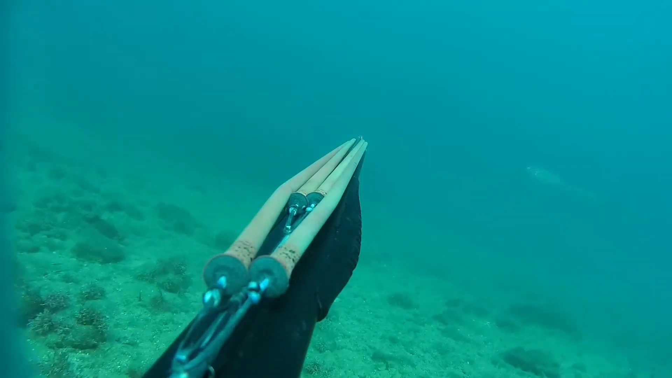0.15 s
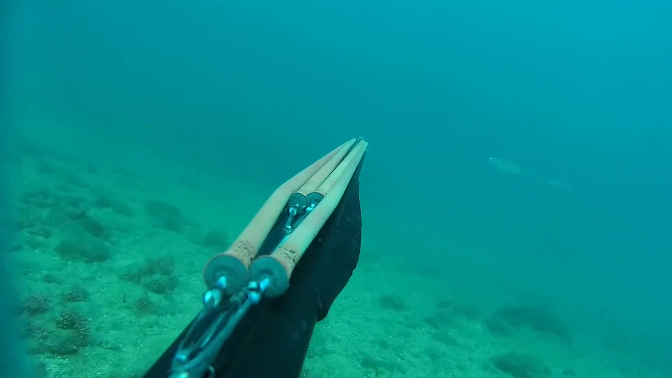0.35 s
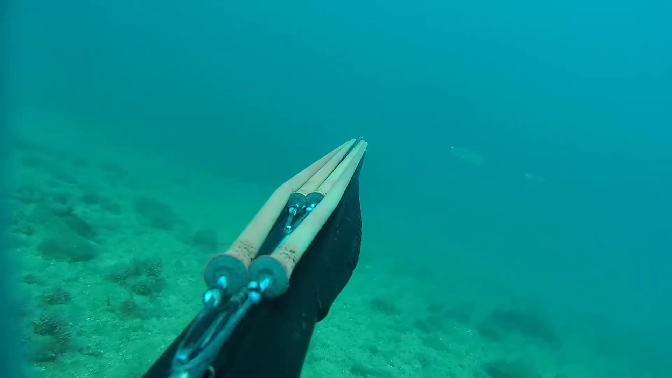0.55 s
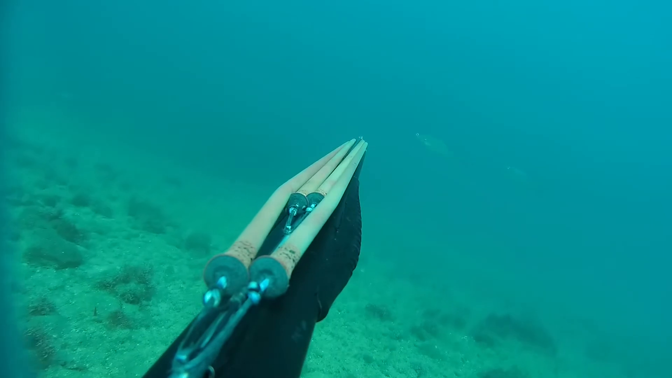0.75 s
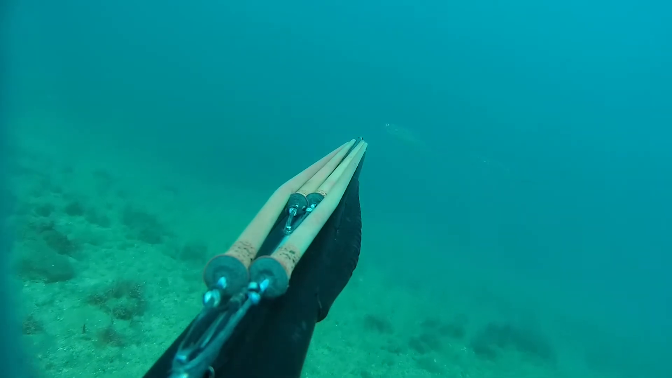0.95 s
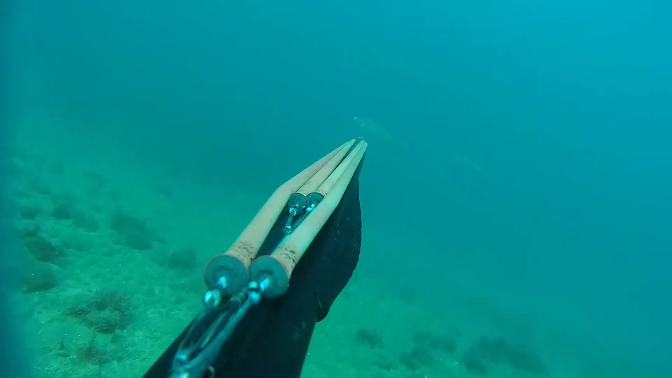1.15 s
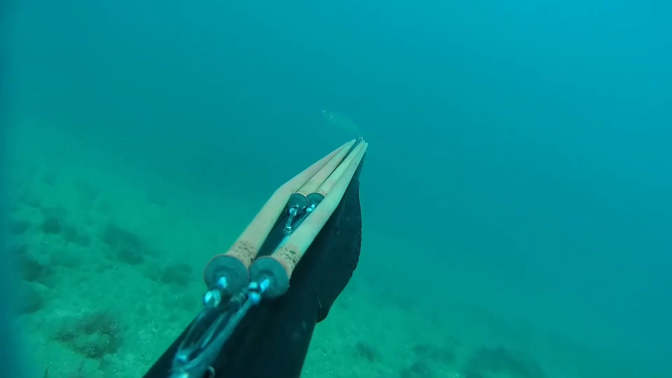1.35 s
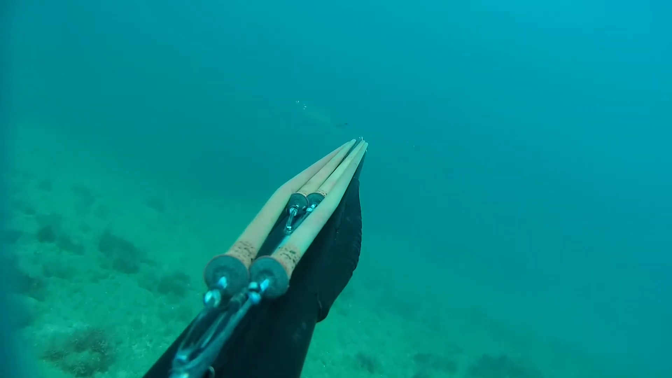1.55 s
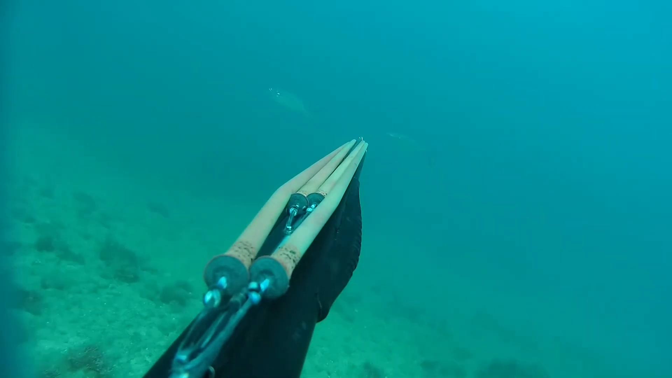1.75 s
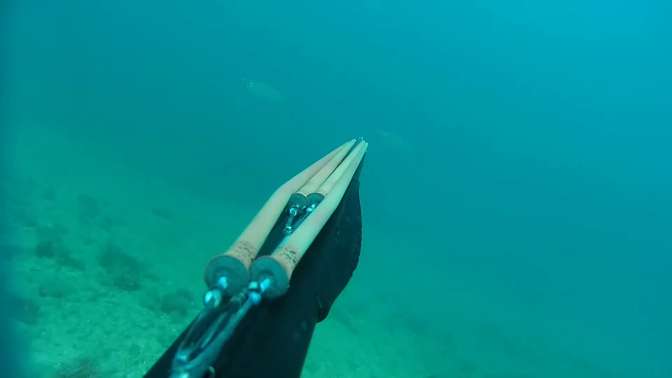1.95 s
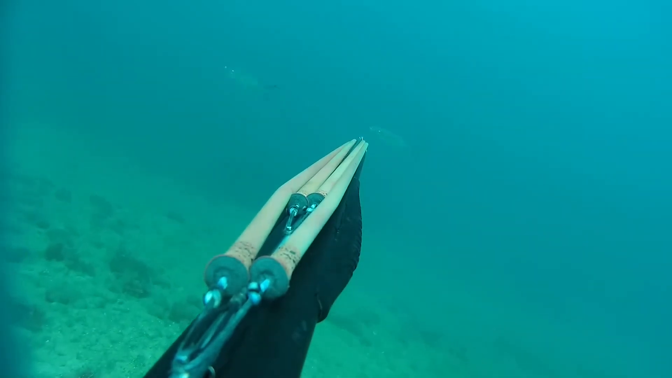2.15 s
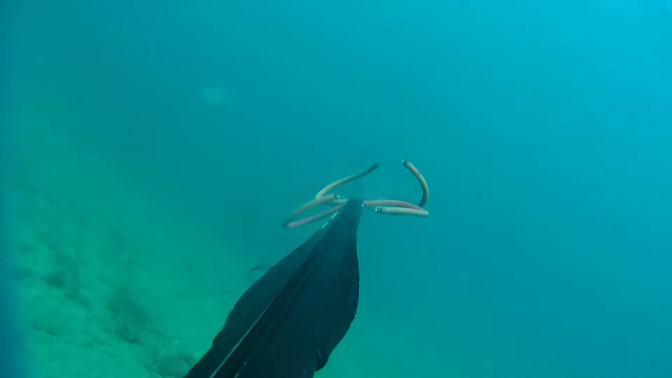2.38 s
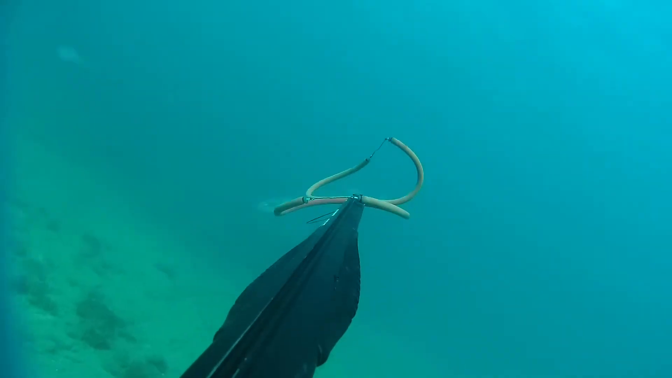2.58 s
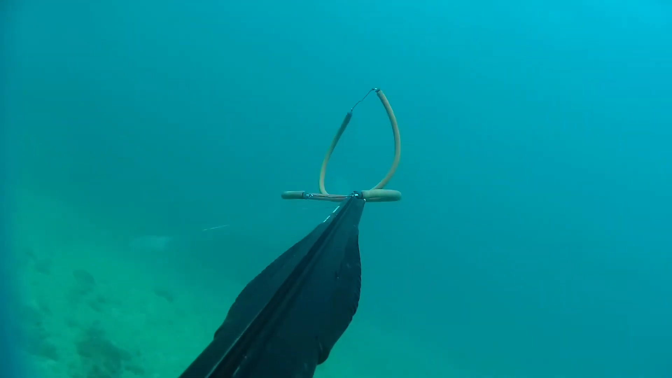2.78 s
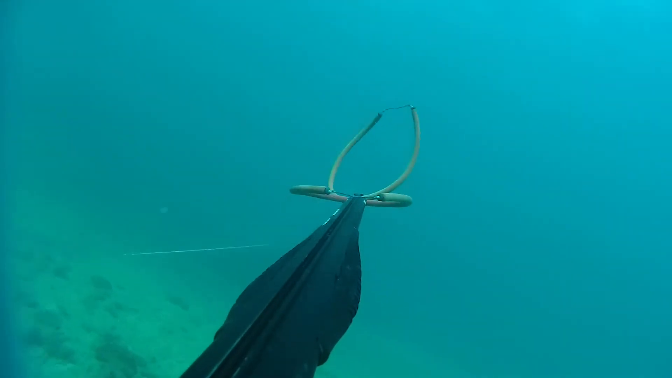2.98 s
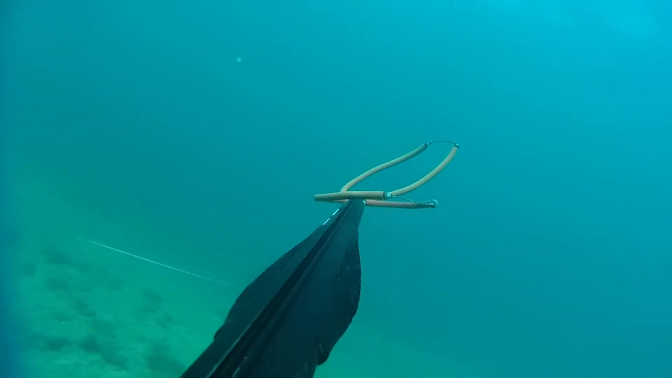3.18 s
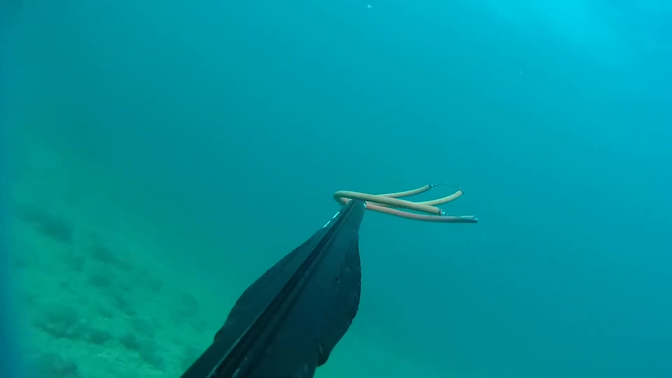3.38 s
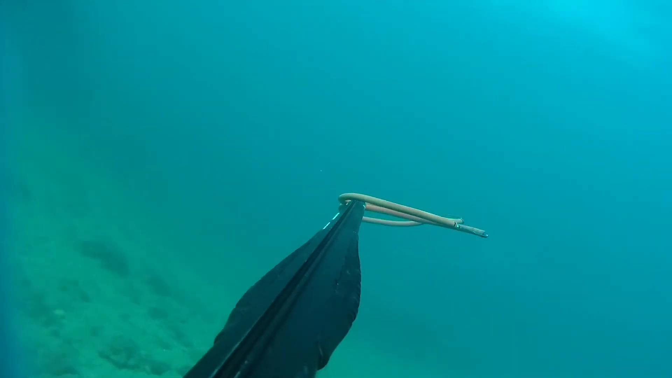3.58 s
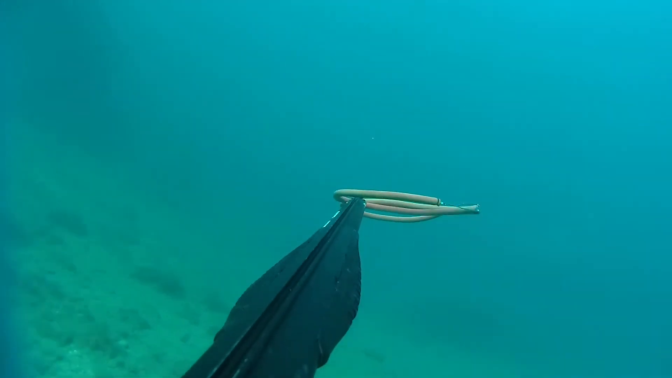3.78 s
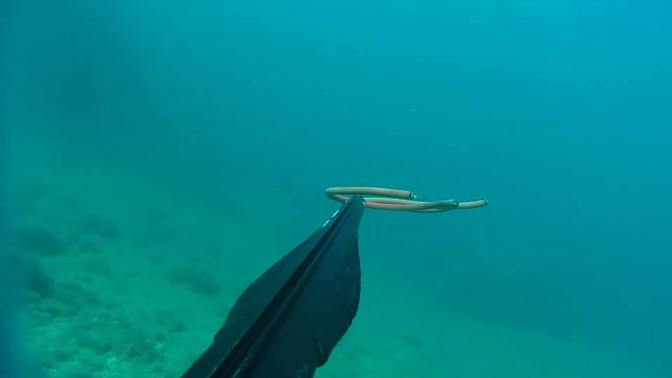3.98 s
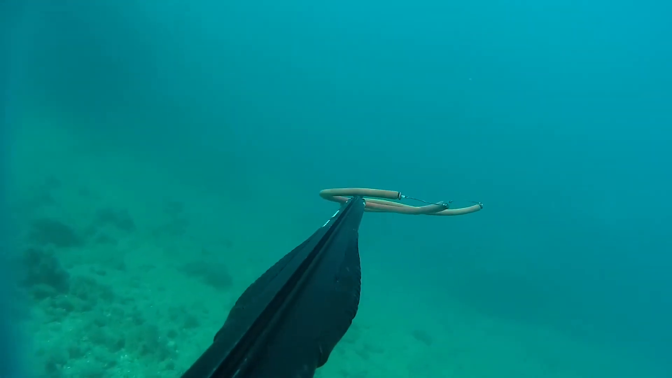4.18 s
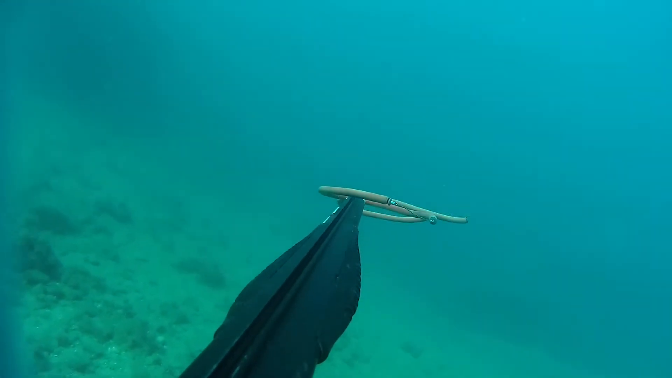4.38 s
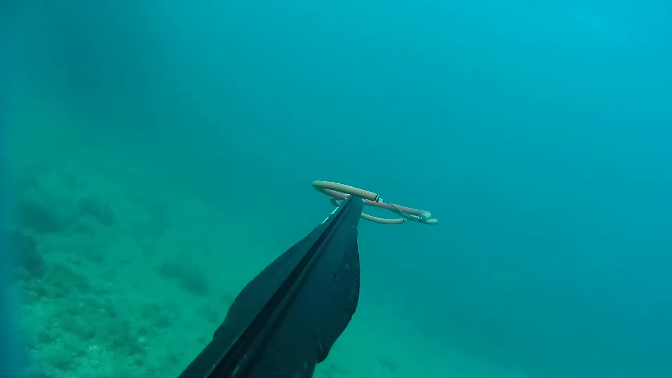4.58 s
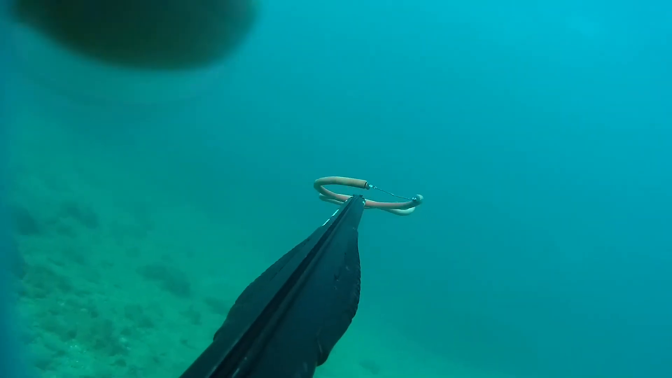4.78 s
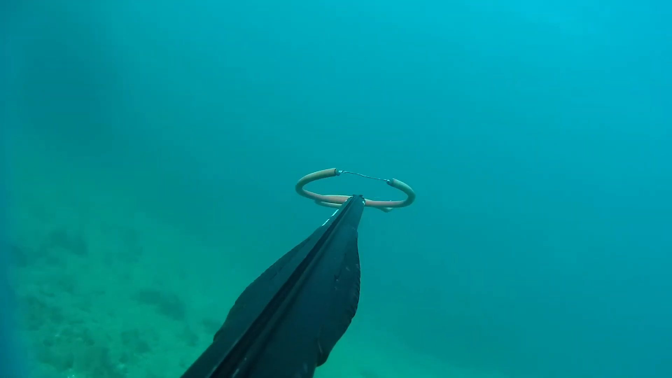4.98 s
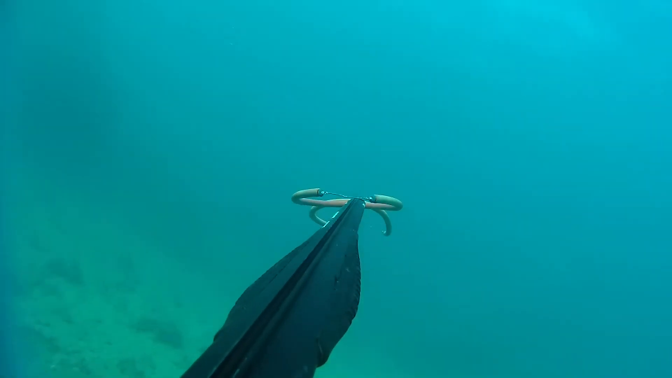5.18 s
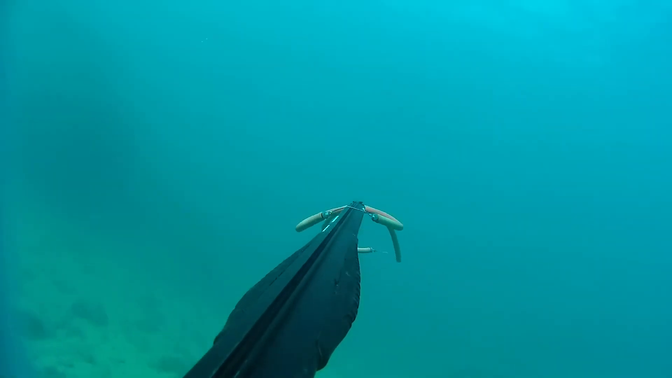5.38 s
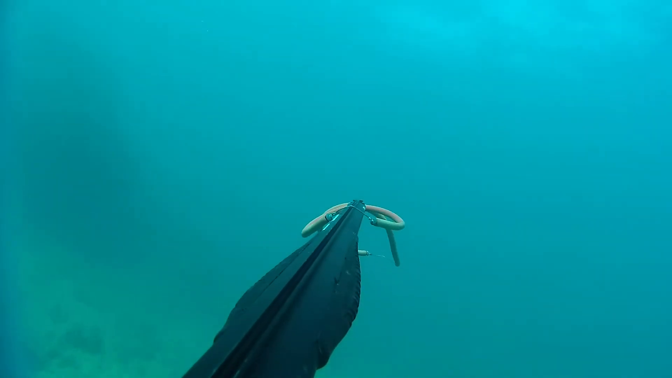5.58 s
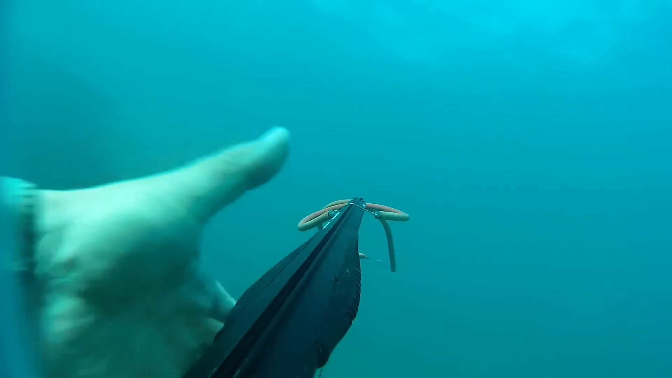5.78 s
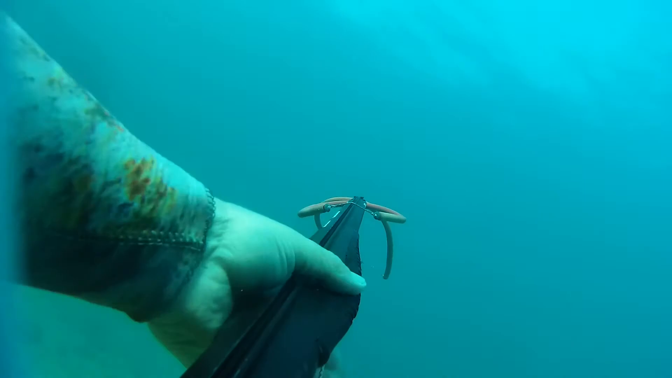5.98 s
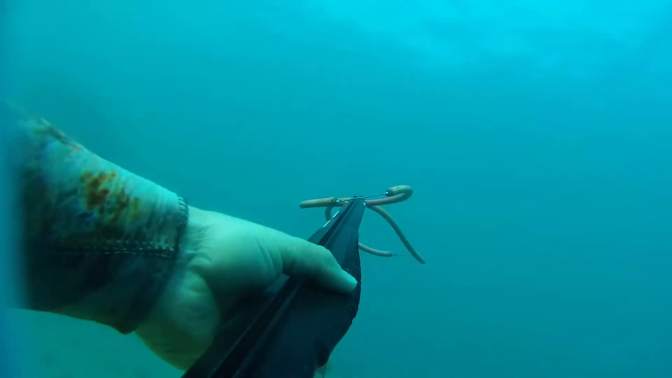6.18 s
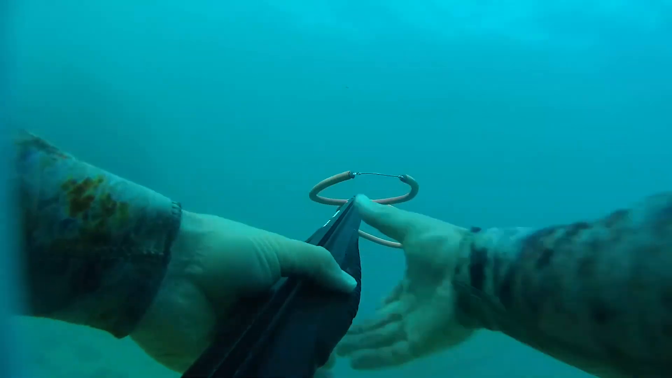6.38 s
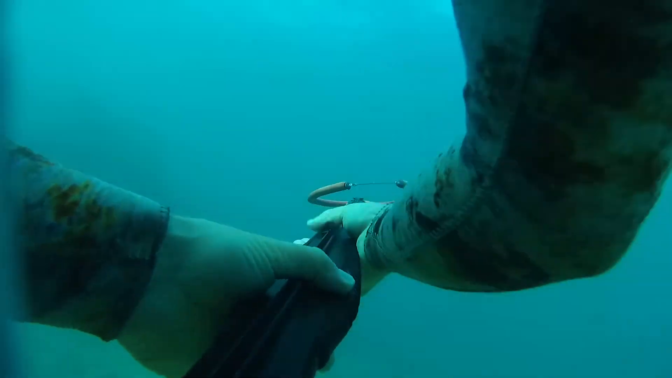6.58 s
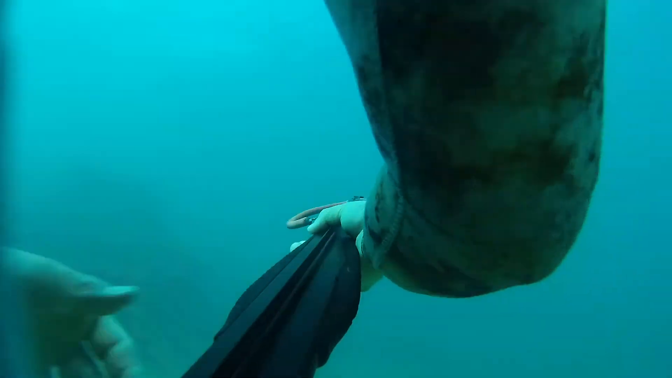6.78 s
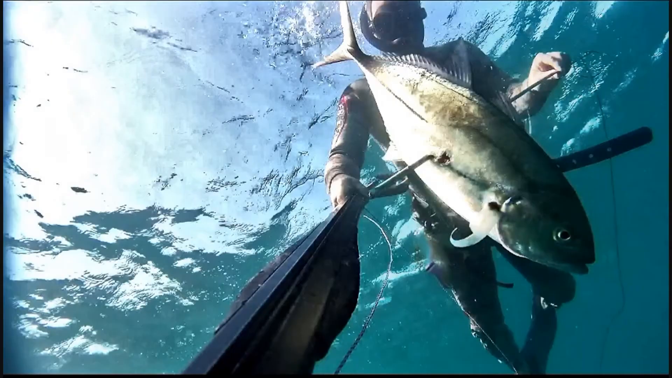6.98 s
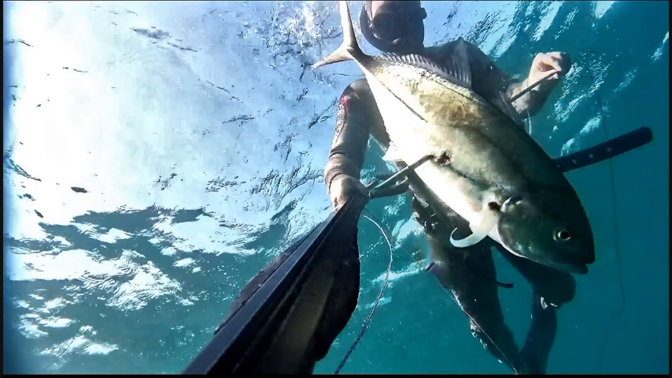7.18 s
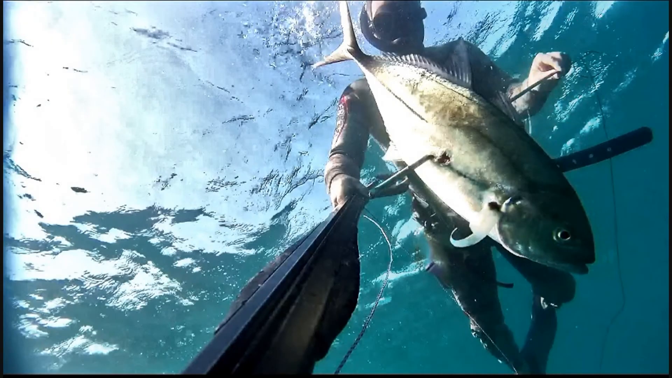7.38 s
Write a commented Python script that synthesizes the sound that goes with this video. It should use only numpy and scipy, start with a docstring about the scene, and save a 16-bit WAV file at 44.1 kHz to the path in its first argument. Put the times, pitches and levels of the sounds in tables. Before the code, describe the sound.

Quiet boxed-in hiss with tiny crackles bursts into a distorted speargun shot, followed by churning line, dull knocks, bubbles and squeaks until abrupt silence.

```python
"""Faint snaps over hiss and whine, then a speargun fires under water and a reel scrapes until a cut to silence.
The camera is clamped to the gun in a sealed case with two microphones: forces on the gun ring the case's modes.
Release, recoil and band slaps overload the input. The line then runs off a reel whose stick-slip drag is
gusty noise, whose knocks are brief contacts, and which squeaks and sheds gliding bubble rings."""
import sys
import numpy as np
from scipy import signal
from scipy.fft import rfft, irfft
from scipy.io import wavfile
from scipy.ndimage import uniform_filter1d

SR = 44100
rng = np.random.default_rng(int(sys.argv[2]) if len(sys.argv) > 2 else 0)


def elevation(decibels):
    """Turn decibel levels (scalar or array-like) into linear amplitude ratios."""
    levels = np.asarray(decibels, float)
    return 10 ** (levels / 20)


def wav_record(signal):
    """Record a signal, one row per channel, as 16-bit PCM in the file named by sys.argv[1]."""
    frames = np.transpose(np.atleast_2d(signal))
    bounded = np.clip(frames, -1, 1)
    # unit amplitude maps onto the largest positive 16-bit level
    quanta = np.round(bounded * 32767).astype(np.int16)
    wavfile.write(sys.argv[1], SR, quanta)


N = 328101
T = np.arange(N) / SR
CUT_S = 6.9037  # silence from here on


def noise(*shape):
    """White noise: independent Gaussian samples of unit variance."""
    return rng.standard_normal(shape + (N,))


def unit(x):
    """Normalization: scale to rms 1."""
    return x / np.sqrt(np.mean(x ** 2))


def walk(rate):
    """Slow random modulation: levels held 1 / rate s, smoothed twice, rms 1."""
    hold = int(SR / rate)
    steps = np.repeat(rng.standard_normal(N // hold + 1), hold)
    smooth = uniform_filter1d(uniform_filter1d(steps, hold), hold)
    return unit(smooth[:N])


def band(x, lo_hz, hi_hz):
    """Band limitation by a Butterworth band-pass."""
    return signal.sosfilt(signal.butter(2, [lo_hz, hi_hz], "band", fs=SR, output="sos"), x)


def resonance(x, hz, width_hz):
    """Damped resonance: a two-pole peak whose quality factor is frequency over width."""
    return signal.lfilter(*signal.iirpeak(hz, hz / width_hz, SR), x)


def contact(forces, s, rise_ms, decay_ms, levels_db, rattle_db=-60, strike=0.31):
    """Impact: one impulse inside a rough contact that builds up, dies within milliseconds and may rattle on."""
    k = np.arange(-400, 2600)
    t_ms = k * 1000 / SR - 1
    before = np.exp(np.minimum(t_ms, 0) / rise_ms)
    after = np.exp(-t_ms / decay_ms) + elevation(rattle_db) * np.exp(-t_ms / 22.0)
    shape = np.where(t_ms < 0, before, after)
    force = shape * rng.standard_normal(len(k))
    force[np.argmax(shape)] += strike * np.sqrt(np.sum(shape ** 2))
    forces[:, int(s * SR) + k] += np.outer(elevation(np.array(levels_db)), force)


# modes of the case: f/Hz, width/Hz, relative level left/dB, right/dB, sign left, sign right
CASE_MODES = [(246.6, 18, -25, -7, 1, 1), (277, 36, -20, -28, -1, 1), (334.7, 20, -24.5, -20, 1, 1),
              (558.4, 50, -51, -54, -1, -1), (712, 23, -29.5, -6, -1, -1), (739.8, 92, -23.5, -3, 1, 1),
              (986.4, 23.2, 9.5, -22.5, -1, -1), (1340, 20, 3.5, -22.5, 1, -1), (1277, 81, 1.5, 9, -1, 1),
              (1540, 160, 1.5, 3, -1, -1), (1867, 291, -0.5, -0.5, 1, 1), (2300, 195, -1.5, -5, -1, -1),
              (3000, 510, -7, -4.5, 1, 1), (3810, 660, -12, -46, 1, -1), (4560, 540, -45, -32.5, 1, 1),
              (5750, 310, -40.5, -46.5, 1, 1), (7300, 1600, -50, -49.5, -1, -1),
              (10600, 2400, -50.5, -55, 1, 1), (14400, 2900, -56, -55.5, -1, -1)]
# borders between the low, middle, high and top modes: f/Hz
GROUP_BORDERS = 900, 2600, 5000


def case(*forces):
    """Modal superposition: four forces ring four groups of modes, each mode weighted per microphone."""
    out = np.zeros((2, N))
    # contacts are soft and far along the gun, so each force keeps to its own range
    reach_hz = [(150., 1560.0), (600., 3660.0), (2200., 5550.0), (4400., 13000.0)]
    for group, force in enumerate(forces):
        modes = [m for m in CASE_MODES if np.searchsorted(GROUP_BORDERS, m[0]) == group]
        force = band(force, *reach_hz[group])
        # about unit sound between the microphones for a unit noise force
        power = sum(np.pi * m[1] / SR * (elevation(m[2]) + elevation(m[3])) ** 2 / 4 for m in modes)
        for hz, width_hz, left_db, right_db, *sign in modes:
            gains = np.sign(sign) * elevation(np.array([left_db, right_db]))
            out += np.outer(gains, resonance(force, hz, width_hz)) / np.sqrt(power)
    return out


# spectral shape of the hiss: f/Hz, relative level/dB
HISS_SHAPE = [(4, 3.5), (16, 6), (35, -2.5), (60, -12), (150, -19), (400, -24), (1500, -35), (6000, -39),
              (8000, -34.5), (11500, -42.5), (14000, -32.5), (15300, -33.5), (15700, -62)]


def hiss():
    """Shaped noise: electronic hiss, partly shared by both inputs and less so toward the treble."""
    hz = np.fft.rfftfreq(N, 1 / SR)
    shape_hz, shape_db = np.transpose(HISS_SHAPE)
    shape = elevation(np.interp(np.log(hz + 1), np.log(shape_hz), shape_db))
    apart = np.clip(hz / 3700.0, .4, 1.5)
    shared, own = rfft(noise()), rfft(noise(2))
    balance = elevation(np.array([[0.], [-6.5]]) / (1 + (hz / 380.0) ** 2))  # less rumble on the right input
    colored = unit(irfft(shape * balance * (shared + apart * own), N))
    return colored * elevation(-57.5 + 0.74 * walk(1.3))


# hum partials: f/Hz, level before balance and drift/dB
HUM_PARTIALS = [(50, -73), (100, -69.5), (150, -75), (200, -86), (300, -83.5)]


def hum():
    """Additive synthesis: steady partials share one wavering level, stronger on the left."""
    tone = sum(elevation(db) * np.sin(2 * np.pi * hz * T + k * k) for k, (hz, db) in enumerate(HUM_PARTIALS))
    return tone * elevation(1.2 * walk(12) + np.array([[1.5], [-3.5]]))


# whine partials: multiple of the base frequency, level left/dB, right/dB
WHINE_PARTIALS = [(2, -69, -101.5), (3, -61.5, -88.5)]


def whine():
    """Frequency modulation: the camera's whine drifts at random and sags once a frame."""
    base_hz, frames_per_s = 4450, 25
    sag = .009 * np.exp(-(T * frames_per_s % 1) / 0.083)
    drift = 0.0005 * walk(6) + 0.0019 * walk(70) + 0.005 * walk(1200) - sag
    phase = 2 * np.pi * np.cumsum(base_hz * (1 + drift)) / SR
    return sum(np.outer(elevation(np.array(db)), np.sin(k * phase)) for k, *db in WHINE_PARTIALS)


def water():
    """Broadband excitation: wavering water noise drives each group of modes."""
    group_db = np.array([[-76.], [-95.], [-82.], [-82.]])
    return noise() * elevation(group_db + 2.0 * walk(23.0))


def air():
    """Cavity resonance: the air in the case, stirred by the sea, sounds as narrow-band noise."""
    return unit(resonance(noise(), 782, 29)) * elevation(-73.5 + np.array([[-3.], [2.5]]))


# small snaps in the water: t/s, nominal level/dB, level above 5 kHz relative to it/dB
SNAPS_HEARD = [(0.1724, -61, 18.5), (0.2414, -46.5, -6), (0.2758, -45, -13), (0.3564, -61, 14),
               (0.582, -42, -13), (0.6465, -37, -23), (0.67, -41, -11), (0.72, -51, -13), (0.85, -43, -19),
               (0.915, -42.5, -4), (1.0165, -51.5, -9), (1.3558, -49, -11), (1.472, -50, -2),
               (1.609, -49, -4), (1.8497, -43.5, 0), (1.924, -60, 18), (1.951, -61, 14),
               (2.0652, -32, -28.5), (2.149, -51, -8)]


def snaps():
    """Impulsive excitation: snaps and a fine crackle ring the upper modes; some snap treble bypasses the case."""
    forces = np.zeros((2, N))
    for s, db, top_db in SNAPS_HEARD:
        contact(forces, s, .6, 3.5, (db - 14.0, db + top_db - 7.5))
    size_db = np.minimum(4.5 * rng.exponential(size=N), 12.) + 4.5 * np.tanh(walk(30))
    clicks_per_s = 600
    crackle = (rng.random(N) < clicks_per_s / SR) * rng.standard_normal(N) * elevation(size_db)
    highpass = signal.butter(4, 1950., "high", fs=SR, output="sos")
    bright = signal.sosfilt(highpass, forces[0] + elevation(-62.5) * crackle)
    middle = elevation(11.0) * band(bright, 2050., 3100.0)
    return case(0 * bright, middle, bright, elevation(-4.0) * bright) + band(forces[1], 4000.0, 15000.)


def bubbles():
    """Bubble resonance: air shaken off line and spool gives short rings gliding upward, louder under heavy drag."""
    count, low_hz, high_hz = 1100, 675, 3510
    cycles, glide = 11.6, 0.072  # pitch rises by this fraction over these cycles
    out = np.zeros((2, N))
    s, drag_db, _ = np.transpose(REEL_DRAG)
    t = np.arange(2000) / SR
    for when, pitch, size, side in rng.random((count, 4)):
        when = s[0] + when * (CUT_S - s[0])
        hz = low_hz * (high_hz / low_hz) ** pitch
        u = t * hz / cycles
        envelope = np.exp(-3 * u) * (1 - np.exp(-12.0 * u))
        ring = np.sin(2 * np.pi * hz * t * (1 + glide * u / 2)) * envelope
        db = np.interp(when, s, drag_db) + 1.5 - 8.0 * pitch - 2.24 * np.log(size + .03)
        sides_db = db + 3.0 * (side - 1.0) * np.array([1, -1])
        start = int(when * SR)
        out[:, start:start + len(t)] += np.outer(elevation(sides_db), ring)
    return out


# squeaks of the rubbing line: start t/s, length/s, first f/Hz, last f/Hz, level before flutter/dB
LINE_SQUEAKS = [(3.594, 0.13, 4000, 3950, -53), (4.31, 0.49, 3970, 4010, -54),
                (4.81, 0.34, 3004, 2980, -48.5), (5.08, 0.069, 2950, 3000, -50),
                (5.163, 0.078, 2810, 3130, -46), (5.357, 0.074, 2300, 2220, -47),
                (5.605, 0.077, 2300, 2300, -48), (6.242, 0.035, 2600, 3320, -47),
                (6.276, 0.063, 2950, 3100, -47), (6.378, 0.094, 1520, 1300, -51),
                (6.459, 0.052, 1565, 1810, -44), (6.512, 0.028, 2800, 3260, -44),
                (6.709, 0.065, 3000, 2960, -46)]


def squeaks():
    """Friction tones: short glides of the rubbing line, unsteady in pitch and size."""
    out = np.zeros(N)
    wobble, flutter = walk(900), elevation(5 * np.tanh(walk(200)))
    for s, length, first_hz, last_hz, db in LINE_SQUEAKS:
        u = np.clip((T - s) / length, 0, 1)
        hz = (first_hz + (last_hz - first_hz) * u) * (1 + .05 * wobble)
        out += elevation(db) * np.sin(np.pi * u) ** .5 * np.sin(2 * np.pi * np.cumsum(hz) / SR)
    return out * flutter


SLACK_START_S = 2.33  # loose line and settling water are heard from here
# water streaming past the case as the diver moves: t/s, rumble level at -41.5 dB drag, before surge and balance/dB
WATER_FLOW = [(2.67, -37), (2.8, -49.5), (3.7, -46.5), (4.3, -50.5), (5.0, -46.5), (5.8, -51), (6.3, -46),
              (6.9, -46)]


def flow():
    """Flow noise: water pushes on the membranes, first the settling wake of the spear, then following the drag."""
    s, drag_db, _ = np.transpose(REEL_DRAG)
    wake_db = np.maximum(-20.5 - 60 * (T - SLACK_START_S) / 0.14, -59.5)  # 60 dB in 0.14 s, to a floor
    early_db = np.where(T < SLACK_START_S, -120, wake_db)
    follow_db = 0.33 * (np.interp(T, s, drag_db) + 41.5)  # 0.33 dB of rumble per dB of drag
    rumble_db = np.where(T < s[0], early_db, np.interp(T, *np.transpose(WATER_FLOW)) + follow_db)
    shared, own = noise(), noise(2)
    push = unit(band(shared + 5.4 * own, 48.0, 150.))
    push = push + elevation(-1) * unit(band(own[::-1], 7.9, 29.0))
    push += elevation(-1) * unit(band(own, 91.0, 370.0)) * elevation(np.array([[-12.], [0.]]))
    surge_db = 2.2 * np.tanh(walk(5.7))
    return push * elevation(rumble_db + surge_db + np.array([[-5.], [3.]]))


# line running off the reel: t/s, nominal drag level/dB, sharpness of the scrape/dB
REEL_DRAG = [(2.67, -50, 1), (2.73, -32.5, -4), (2.84, -41.5, -1), (3.25, -33.5, -1), (3.46, -37, -0.5),
             (3.58, -36, 0.5), (3.7, -39.5, -2.5), (3.77, -48.5, -0.5), (3.96, -37, 0.5), (4.02, -47, 0),
             (4.2, -42.5, 0.5), (4.27, -37.5, 2.5), (4.41, -34, -1.5), (4.6, -35, 0.5), (4.82, -38, 0),
             (5.03, -40, -3), (5.33, -41.5, -0.5), (5.55, -38.5, -4.5), (5.81, -41.5, -2),
             (6.04, -45, -0.5), (6.348, -43, -3), (6.42, -51, 0), (6.558, -40, -6.5), (6.72, -37.5, 4.5),
             (6.76, -37, -1)]
# share of the drag on low, middle, high and top modes: level/dB
DRAG_SHARES = [-3.5, -1.6, -15.5, -22]
# drag on the low modes as the grip on the gun changes: t/s, relative level/dB
GUN_GRIP = [(2.7, -1.5), (3.4, 1.5), (3.9, 0.5), (4.4, -1.5), (5.05, 5.5), (5.5, -1.5), (5.85, -7),
            (6.9, -4.5)]
# loose line brushing the gun before the reel starts, by mode group: nominal level/dB
SLACK_LINE = [-56.5, -60, -77, -76.5]


def drag():
    """Stick-slip friction: the line's force is dense uneven noise in short gusts, shared among the mode groups."""
    s, *columns = np.transpose(REEL_DRAG)
    pull_db, sharp_db = (np.interp(T, s, c) for c in columns)
    grip_db = np.interp(T, *np.transpose(GUN_GRIP))
    # the top modes follow the sharpness more steeply
    tilt_db = np.array([grip_db, 0 * T, sharp_db, 1.4 * sharp_db])
    running_db = pull_db + np.array(DRAG_SHARES)[:, None] + tilt_db
    slack_db = np.where(T < SLACK_START_S, -120, np.array(SLACK_LINE)[:, None])
    drag_db = np.where(T < s[0], slack_db, running_db)
    gusts_db = 2.8 * np.tanh(walk(90)) + 1.6 * np.array([walk(60) for _ in range(4)])
    return noise() * elevation(drag_db + gusts_db + 2.65 * walk(400) + 0.5)


# knocks of trigger, reel and hands on the gun: t/s, nominal level/dB, low modes relative to it/dB
GUN_KNOCKS = [(2.128, -46.5, 4), (2.68, -22.5, -0.5), (2.711, -23, -33), (2.805, -27, -1),
              (2.895, -25.5, -4), (2.989, -22.5, -3), (3.012, -18.5, -18), (3.068, -28, 9.5),
              (3.153, -35, 9), (3.249, -17.5, -15), (3.284, -13.5, -23), (3.307, -18.5, -29),
              (3.35, -20, -3.5), (3.383, -23.5, 4), (3.473, -23, 1.5), (3.514, -16, -14),
              (3.696, -17.5, -1.5), (3.762, -20, -11.5), (3.951, -19.5, -33), (4.046, -28, 2.5),
              (4.266, -19, -13), (4.353, -18.5, -9), (4.387, -16.5, -25), (4.467, -31, 7),
              (4.507, -26, 4.5), (4.586, -15.5, -5.5), (4.739, -17, -8.5), (4.798, -16.5, -5),
              (4.871, -14, -9), (4.938, -26.5, 9), (5.012, -18.5, 0.5), (5.084, -18, -5), (5.15, -19.5, -5),
              (5.214, -16, 2), (5.3, -30, 6), (5.444, -17.5, -11), (5.504, -22, -5), (5.527, -17, -6),
              (5.571, -14, -4), (5.602, -38.5, 14.5), (5.654, -22, 0), (5.68, -23, -5), (5.74, -26.5, 2),
              (5.903, -21, -12), (5.953, -26, -3), (6.0, -28, -1), (6.05, -23, -21), (6.183, -26, -7),
              (6.278, -12.5, -23), (6.344, -15, -7), (6.454, -29, -12), (6.525, -21.5, -9),
              (6.559, -14, -12), (6.689, -17, -26), (6.726, -26.5, 2.5), (6.788, -34, -19),
              (6.844, -22.5, -21), (6.874, -42, -12)]


def knocks():
    """Soft impacts: long contacts give dull knocks, joined by random rattle of the loose spool."""
    forces = np.zeros((4, N))
    s, drag_db, _ = np.transpose(REEL_DRAG)
    when, size, place = rng.random((40, 3)).T
    when = s[0] + when * (CUT_S - s[0])
    rattle_db = np.interp(when, s, drag_db) + 6.5 - 2 * size
    rattle = zip(when, rattle_db, 4.0 - 22.5 * place)
    for start_s, db, low_db in list(GUN_KNOCKS) + list(rattle):
        levels_db = db + np.array([low_db - 3.0, -8.0, -27.0, -52.0])
        contact(forces, start_s, 1.5, 4.8, levels_db, strike=0.56)
    return forces


# swings of the gun, and one jolt: start t/s, f/Hz, T60/s, level left/dB, right/dB, sign left, sign right
GUN_RECOIL = [(2.268, 15, 0.32, -7.5, 3.5, 1, -1), (2.268, 65, 0.32, -16, -9.5, -1, -1),
              (2.27, 100, 0.2, -9.5, -2.5, -1, -1), (2.346, 38, 0.11, -28, -23, -1, -1),
              (2.405, 29, 0.26, -40, -19, 1, 1), (4.599, 48, 0.12, -46, -22.5, -1, -1)]


def recoil():
    """Damped oscillation: the whole gun kicks and swings out at a few low rates."""
    out = np.zeros((2, N))
    for s, hz, t60, left_db, right_db, *sign in GUN_RECOIL:
        t = np.maximum(T - s, 0)
        swing = np.sin(2 * np.pi * hz * t) * elevation(-60 * t / t60)
        out += np.outer(np.sign(sign) * elevation(np.array([left_db, right_db])), swing)
    return out


# release and band slaps: t/s, nominal level/dB, low modes and crack relative to it/dB
SHOT_SLAPS = [(2.2686, 3.5, -13, -12.5), (2.2722, -9, -9, -0.5), (2.2787, 5.5, -7.5, -8.5),
              (2.2903, -11.5, 2, 3.5), (2.3005, -13, 8, -2.5), (2.3058, -11, 6, -5),
              (2.3196, -23, -3, -9.5), (2.3422, -14.5, -19, -8.5), (2.3562, -24.5, -5.5, -13),
              (2.372, -16, -16, -10), (2.3848, -24, -14, -8), (2.4296, -28, -12.5, -14.5),
              (2.4954, -31.5, -6.5, -13), (2.5116, -55.5, 11.5, -8), (2.5731, -45.5, -11, -14)]


def shot():
    """Hard impacts: taut bands make brief contacts; as they slacken, contact lengthens and treble dulls."""
    forces = np.zeros((4, N))
    taut_ms, slack_ms, slacken_s = 1.2, 3.2, 0.017
    for s, db, low_db, crack_db in SHOT_SLAPS:
        since_s = s - SHOT_SLAPS[0][0]
        decay_ms = slack_ms + (taut_ms - slack_ms) * np.exp(-since_s / slacken_s)
        dull_db = -13.5 * (1 - np.exp(-since_s / 0.042))
        levels_db = db + np.array([low_db + 11.0, 1.5, crack_db + 1.7, crack_db + 1.5 + dull_db])
        contact(forces, s, .4, decay_ms, levels_db, rattle_db=-20.5, strike=0.44)
    return forces


def blows():
    """Impulse response: quick blows of shot and reel hardly move the slowest modes."""
    forces = knocks() + shot()
    forces[0] = band(band(forces[0], 380.0, 4000.), 270.0, 4300.0)
    return forces


def scene():
    """Superposition: forces on the gun sound through the case, beside flow, air, tones and electronics."""
    background = hiss() + hum() + whine() + air() + snaps()
    line = bubbles() + squeaks() + flow()
    gun = case(*(water() + drag() + blows())) + recoil()
    return background + line + gun


def roll_off(x):
    """The treble ends steeply here."""
    return signal.sosfilt(signal.butter(12, 16120, fs=SR, output="sos"), x)


def record(dry):
    """Saturation and band limitation: overload flattens the peaks, treble ends at 15.7 kHz, sound is cut off."""
    top = .75  # full swing of the input
    flat = dry / (1 + np.abs(dry / top) ** 6) ** (1 / 6)
    lowpass = signal.ellip(8, .5, 60, 15700, fs=SR, output="sos")
    mix = signal.sosfilt(lowpass, flat * (T < CUT_S))
    return roll_off(mix)


dry = scene()
out = record(dry)
wav_record(out)
```